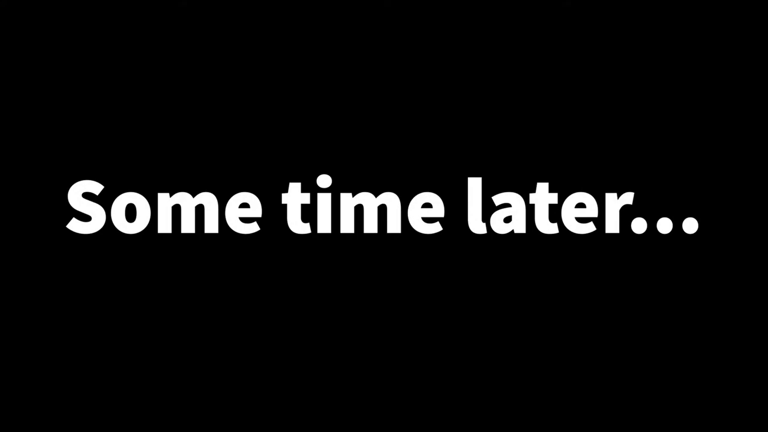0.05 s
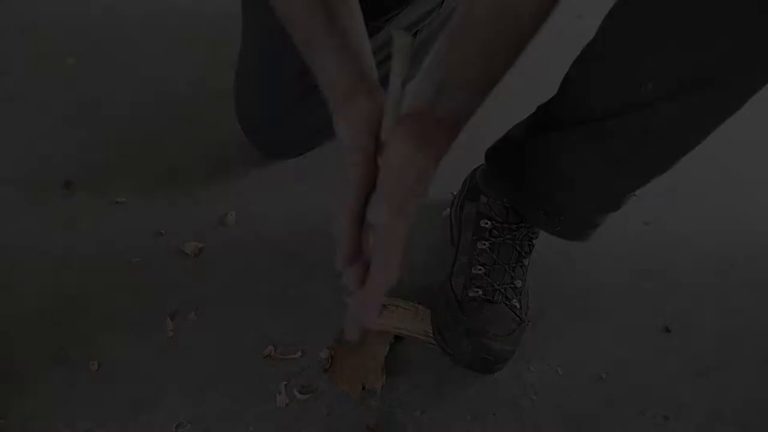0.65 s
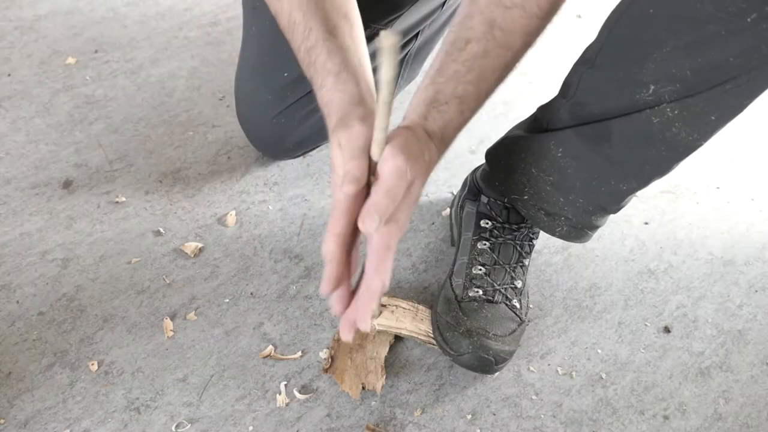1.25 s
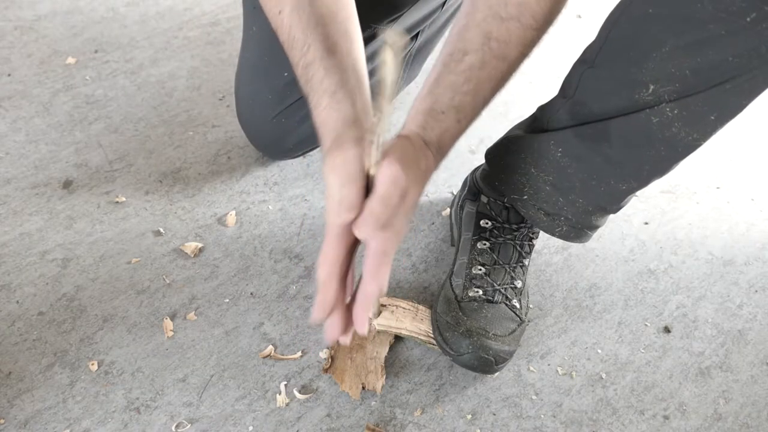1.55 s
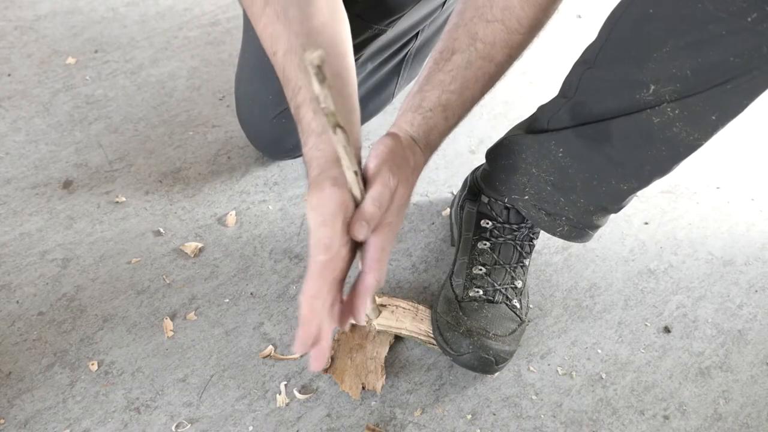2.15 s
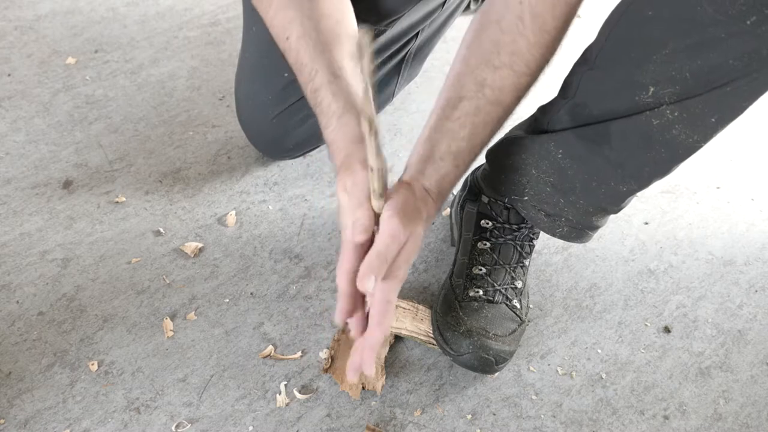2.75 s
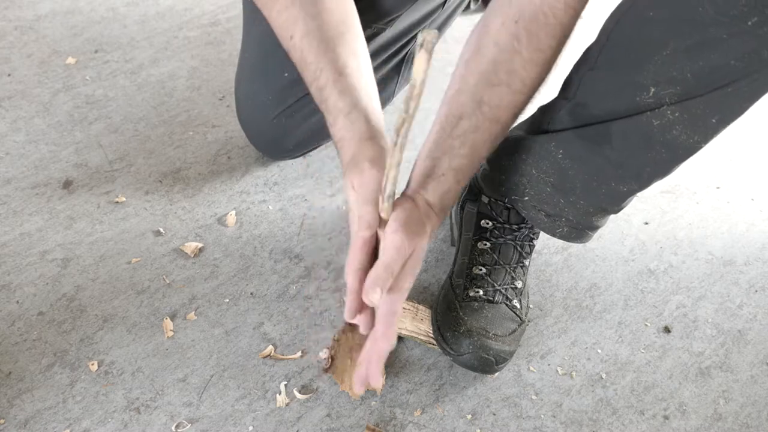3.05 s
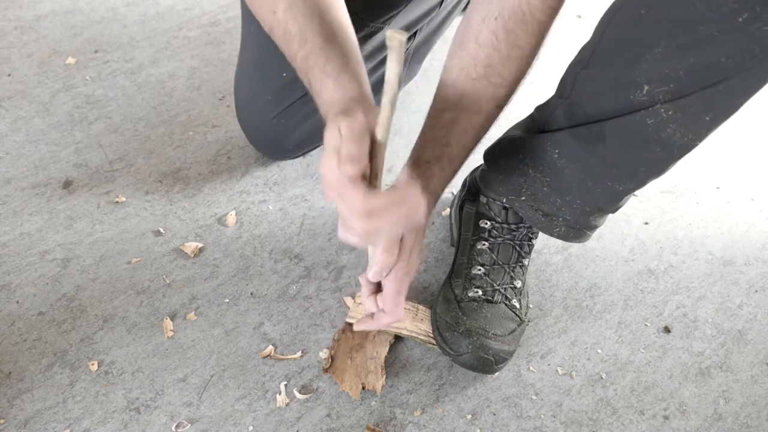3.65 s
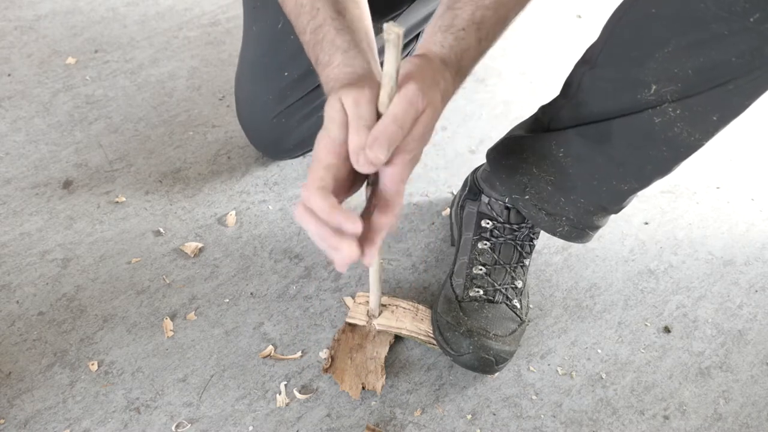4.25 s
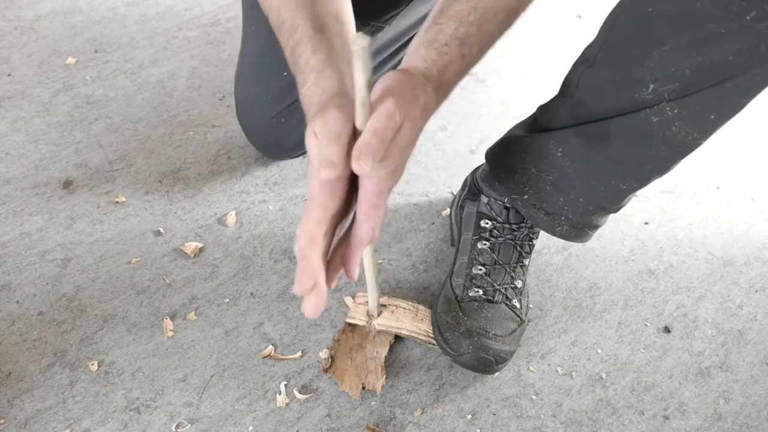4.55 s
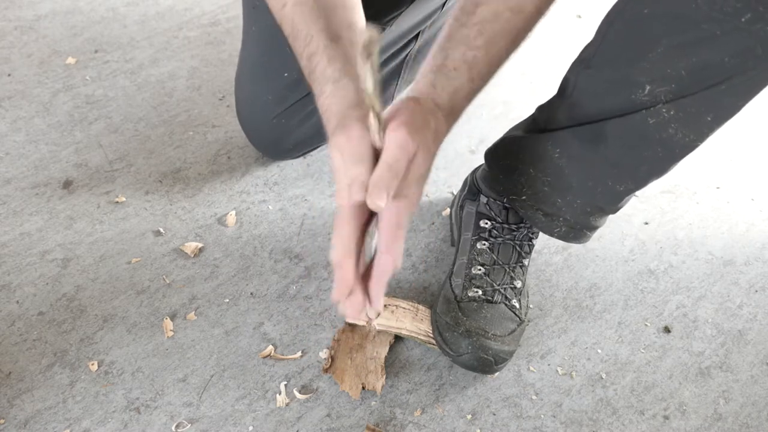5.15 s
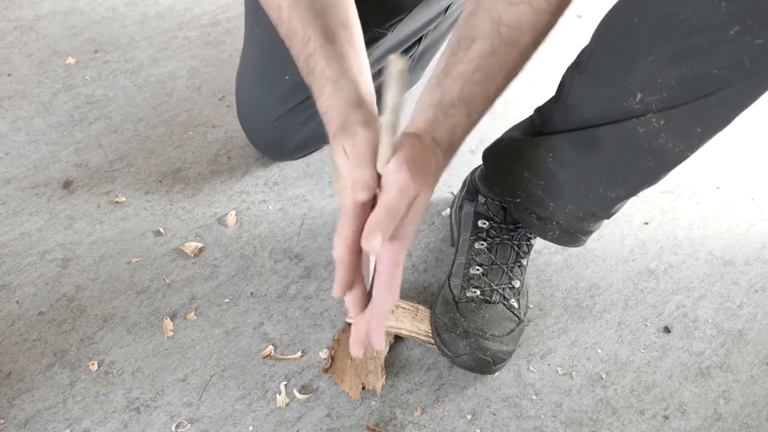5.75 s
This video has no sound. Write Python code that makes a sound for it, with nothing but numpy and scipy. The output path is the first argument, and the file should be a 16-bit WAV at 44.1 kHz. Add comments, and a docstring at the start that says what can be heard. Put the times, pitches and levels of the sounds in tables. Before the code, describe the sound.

After silence, rhythmic scratchy rubbing fades in at about 0.7 seconds over soft outdoor air. A wooden spindle is twirled between dry palms and grinds into a wooden board, about seven strokes a second. From 0.9 seconds the tip gives a wavering, pulsing squeal, with loud, sharp chirps between 1 and 2.5 seconds and a few splinter clicks and light knocks. The squeal weakens around 3 seconds. From 3.3 to 4.3 seconds the strokes turn very light, and a brief, soft swish comes near 4 seconds as a hand slides up the spindle. At 4.4 seconds the hissing and grinding resume, at first with a faint hoarse whistle and several sharp little snaps and a knock up to 5.4 seconds. The squeal returns at 5.6 seconds, with a loud chirp just before 6 seconds.

```python
"""Rhythmic hissing and grinding fade in from silence, over soft outdoor air: a hand drill, its wooden
spindle twirled between two palms on a fire board on a concrete floor. Sliding friction hisses on the skin
and drives the resonances of spindle and board. Stick-slip makes the tip squeal, and chirp loudly where it
grabs; splinters snap, the spindle knocks, and hard strokes whistle. Midway the strokes turn light
while the hands slide back to the top of the spindle; then the drilling resumes."""
import sys
import numpy as np
from scipy import signal
from scipy.fft import rfft, irfft, next_fast_len
from scipy.io import wavfile
from scipy.ndimage import uniform_filter1d, minimum_filter1d, map_coordinates

SR = 44100
rng = np.random.default_rng(int(sys.argv[2]) if len(sys.argv) > 2 else 0)


def unload_audio(sound):
    """Save the sound as a 16-bit wav file, at the path given as the first command line argument."""
    columns = np.transpose(np.atleast_2d(sound))
    # keep every value between -1 and 1, then stretch to whole-number steps
    steps = np.round(np.clip(columns, -1, 1) * 32767)
    wavfile.write(sys.argv[1], SR, steps.astype(np.int16))


N = 264728

# spectra of outdoor air, skin on wood, a splinter and a sliding hand: f/Hz, relative density/dB
AIR_SPECTRUM = [(25, -38), (70, -17), (130, -6), (240, 0), (400, -5.5), (580, -2.5), (950, -9),
                (1400, -6.5), (3000, -15), (6000, -20), (15000, -50)]
SKIN_SPECTRUM = [(200, -26), (900, -19), (2000, 2.5), (3100, 2.5), (3700, -0.5), (4400, 2.5), (5900, -3.5),
                 (6600, 1.5), (8500, -5.5), (10300, -2), (12000, -9.5), (15000, -11)]
SPLINTER_SPECTRUM = [(300, -9), (1500, -4), (3000, 16), (4500, 12.5), (7000, -4.5), (11000, -9),
                     (15000, -5)]
SWISH_SPECTRUM = [(2000, -30), (5000, -6), (7500, 4), (10500, -3), (15000, -11)]
# likeness of the two channels for air and for rubbing: f/Hz, left-right correlation
AIR_CORRELATION = [(40, -0.068), (130, -0.6), (300, 0.22), (700, 0.34), (2000, 0.68), (10000, 0.62)]
RUB_CORRELATION = [(150, 0.27), (500, 0.38), (1500, 0.93), (4000, 0.83), (8000, 0.9), (14000, 0.7)]
# sweeps of the palms, about 7 a second, light during the regrip (3.3-4.3 s):
# start t/s, duration/s, fastest point/fraction, skin level/dB, grinding level/dB, board level/dB
PALM_STROKES = [(0.649, 0.068, 0.26, -42, -44.5, -63), (0.742, 0.12, 0.47, -41, -37.5, -48),
                (0.879, 0.12, 0.2, -38, -36.5, -48), (1.016, 0.11, 0.45, -35.5, -31.5, -42.5),
                (1.134, 0.14, .45, -37.5, -33.5, -44.5), (1.291, .11, 0.28, -38, -39, -52.5),
                (1.421, 0.15, 0.58, -39.5, -37.5, -51.5), (1.582, 0.11, 0.27, -38, -40, -54),
                (1.699, 0.12, 0.75, -38.5, -36.5, -52.5), (1.841, .12, 0.68, -35.5, -38, -47.5),
                (1.98, 0.12, 0.25, -37.5, -36.5, -44), (2.1, 0.1, 0.98, -36.5, -38, -46.5),
                (2.229, 0.14, 0.28, -38.5, -39, -48), (2.359, 0.13, 0.5, -37.5, -36, -48.5),
                (2.486, 0.1, 0.5, -40, -35.5, -60), (2.61, 0.11, 0.62, -41, -37.5, -72),
                (2.743, 0.13, 0.46, -42.5, -37, -56), (2.893, 0.1, 0.4, -39.5, -34, -69),
                (3.013, .12, 0.31, -41, -37, -53), (3.151, 0.1, 0.6, -38, -34.5, -50.5),
                (3.261, 0.087, .3, -46, -40.5, -51.5), (3.34, 0.33, 0.1, -59, -56, -51),
                (3.605, 0.6, 0.15, -54.5, -66, -51.5), (3.878, 0.27, 0.37, -51, -46, -51),
                (4.083, 0.11, 0.84, -51.5, -55, -47.5), (4.2, 0.15, 0.57, -54, -74, -50),
                (4.395, 0.11, 0.69, -37, -36, -45), (4.516, 0.17, 0.43, -39, -34, -45.5),
                (4.658, 0.12, 0.42, -36.5, -35, -44), (4.799, 0.1, 0.46, -35, -34, -49),
                (4.917, 0.11, 0.39, -38, -33, -46.5), (5.05, 0.11, 0.37, -34.5, -33, -45.5),
                (5.163, 0.14, 0.64, -38.5, -33, -54.5), (5.326, 0.13, 0.22, -40, -34, -45),
                (5.454, 0.12, 0.77, -39.5, -34, -49), (5.594, 0.17, 0.19, -42, -35.5, -48.5),
                (5.725, .14, 0.57, -37.5, -34, -47), (5.884, 0.1, 0.56, -36, -34, -46.5)]
# resonances of the spindle, of the board, and the one that whistles: f/Hz, bandwidth/Hz, gain/dB
SPINDLE_MODES = [(1230, 48, -30), (1800, 300, 4.5), (2072, 320, 8), (2423, 150, 1), (2950, 88, 1.5),
                 (3264, 30, 5), (4146, 220, -2.5), (5390, 350, -10.5), (6040, 170, -18), (7530, 270, -51.5)]
BOARD_MODES = [(467, 140, -3.5), (577, 180, -1.5), (970, 1600, -12), (1670, 230, 38), (1780, 260, -2),
               (2430, 230, -11), (4240, 350, -18)]
WHISTLE_MODE = (4290, 200, 0)
# stick-slip of the tip, one list for each pass of the hands:
# t/s, level/dB, f/Hz, relative octave level/dB, relative third partial level/dB, roughness (0-1)
SQUEAL_PASSES = [
    [(.87, -34.5, 1600, -5.5, -24, 0.72), (1.1, -36.5, 1681, -10, -23, 0.4),
     (1.22, -28.5, 1637, -12.5, -14, 0.8), (1.3, -42, 1644, -25, -17, 0.5),
     (1.37, -27.5, 1494, -17, -12, 0.4), (1.88, -30, 1540, -19, -24, 0.45),
     (1.98, -19.5, 1571, -15, -22, 0.26), (2.24, -28, 1567, -7.5, -14, 0.42),
     (2.5, -28.5, 1610, -3, -21, 0.14), (2.7, -34, 1628, -6, -13, 0.39), (2.87, -41, 1656, -14, -17, .35),
     (3.3, -39, 1662, -19, -16, 0.7), (3.52, -55, 1682, -13, -12, 0.34)],
    [(5.61, -30, 1644, -25, -29, 0.38), (5.78, -29, 1625, -21, -16, .4), (5.88, -37, 1630, -17, -18, 0.35),
     (6.0, -29.5, 1600, -1, -10, 0.4)],
]
# reverberation of the surroundings: f/Hz, T60/s
REVERB_TIMES = [(200, 0.1), (2000, 0.64), (10000, 0.054)]
# splinters breaking in the socket: t/s, peak level/dB
SPLINTER_SNAPS = [(0.8814, -33), (1.0539, -10.5), (1.6624, -15.5), (2.9189, -40), (3.1866, -31),
                  (3.568, -39), (3.942, -30), (4.593, -18), (4.8182, -27), (4.8647, -11.5), (5.1183, -7),
                  (5.3583, -10), (5.3644, -12.5)]
# grabs of the tip: t/s, level/dB, f/Hz, glide/(Hz/s), rise/s, fall/s,
# relative overtone level/dB, relative scrape level/dB
TIP_GRABS = [(.884, -23.5, 2110, -20000, .002, 0.0017, -25, -29),
             (1.0611, -6, 1580, 0, 0.0012, 0.0012, -13, -28),
             (1.343, -3, 1508, -8000, 0.0051, 0.0056, -21.5, -22.5),
             (1.627, -2, 1563, -4000, 0.002, 0.006, -26, -26.5),
             (1.9074, 7, 1575, -1500, 0.0016, 0.011, -5, -25),
             (2.125, -17, 1524, 0, 0.0026, .0063, -14.5, -36),
             (2.161, -3.5, 1551, -1000, 0.0034, 0.0075, 4, -14.5),
             (2.426, 1.5, 1613, 1000, 0.0033, 0.0052, -1.5, -21.5),
             (2.541, -19.5, 1647, 0, 0.0029, 0.021, -8, -35),
             (2.693, -25.5, 1623, 0, 0.015, 0.0096, -25, -30), (5.283, -24, 2600, 0, .008, .005, -17, -12),
             (5.621, -26, 1080, 19998, 0.0033, .006, 1, -12),
             (5.631, -10.5, 1640, 1000, 0.006, 0.006, -12.5, -32),
             (5.693, -27, 1663, 0, .002, 0.013, -9, -16), (5.938, 1, 1611, -1500, 0.0022, 0.0055, -11, -25)]
# overtones of a chirp: harmonic number, level/dB relative to the grab's overtone level
GRAB_HARMONICS = [(2, -3.5), (3, -21.5), (4, -22), (5, -47)]
# impacts of the spindle on the socket wall: t/s, knock peak level/dB, thud peak level/dB
WALL_IMPACTS = [(1.060, -11.5, -12.5), (1.225, -22.5, -30), (2.322, -26, -30), (2.816, -35, -29.5),
                (3.046, -23, -31), (3.213, -29, -29), (5.3618, -40, -26), (5.3647, -13, -24),
                (5.626, -31, -33), (5.76, -24, -21)]
# whistles of hard-pressed strokes: t/s, level/dB
WHISTLE_SWELLS = [(2.94, -46), (3.06, -43), (3.205, -44), (4.458, -34), (4.585, -37.5), (4.86, -42),
                  (4.96, -42.5), (5.1, -42)]
# a hand sliding up the spindle: t/s, level/dB
HAND_SLIDE = [(3.95, -60), (3.978, -47), (3.992, -36.5), (4.01, -47), (4.05, -58)]
# opening fade: t/s, gain
FADE_IN = [(0, 0), (.62, 0), (.7, .4), (.8, 1)]

SKIN_LAW, GRIND_LAW, BOARD_LAW, SQUEAL_LAW = 0.82, 0.78, 0.86, 0.54  # amplitude follows speed ** law
SHAKE, WAVER, DRIFT = 0.00555, .008, .009  # fast, medium and slow fractional changes of the squeal's pitch


def amp(db):
    """Amplitude ratio of a level in decibels."""
    return 10 ** (np.asarray(db) / 20)


def unit(x):
    """Normalisation to rms 1."""
    return x / np.sqrt(np.mean(np.abs(x) ** 2) + 1e-20)


def along(points, hz):
    """Interpolation of (f/Hz, value) points on a logarithmic frequency axis."""
    f, v = np.transpose(points)
    return np.interp(np.log(hz + 1), np.log(f + 1), v)


def curves(rows):
    """Linear interpolation in time: one value per sample for each column after the first."""
    times, *columns = np.transpose(rows)
    return [np.interp(np.arange(N) / SR, times, column) for column in columns]


def wobble(rate, size=N):
    """Smooth random modulation: a spline through rate knots a second."""
    knots = rng.standard_normal(size // 10)
    return map_coordinates(knots, [np.arange(size) * rate / SR], mode="wrap")


def filtered(x, response):
    """Linear filtering: the spectrum of x times a complex frequency response."""
    m = next_fast_len(N + SR // 2)
    return irfft(rfft(x, m) * response(np.fft.rfftfreq(m, 1 / SR)), m)[..., :N]


def body(modes, hz):
    """Modal superposition: damped resonances add, with notches between them."""
    return sum(amp(db) * 1j * hz * width / (f * f - hz * hz + 1j * hz * width) for f, width, db in modes)


def rush(colour, patchy_db, grain_db, correlation=RUB_CORRELATION):
    """Modulated stereo noise of rms 1: grains of random size, coloured, in drifting spectral patches."""
    grains = rng.standard_normal((2, N)) * amp(grain_db * wobble(1500))
    spectra = signal.stft(grains, nperseg=512)[2]
    patches = uniform_filter1d(rng.standard_normal(spectra.shape[1:]), size=4, axis=0)
    patches = uniform_filter1d(patches, size=7, axis=1)
    pair = signal.istft(spectra * amp(patchy_db * unit(patches)), nperseg=512)[1][:, :N]
    angle = lambda hz: np.arccos(np.clip(along(correlation, hz), -1, 1)) / 2
    mid, side = filtered(pair, lambda hz: colour(hz) * np.array([np.cos(angle(hz)), np.sin(angle(hz))]))
    return unit(np.array([mid + side, mid - side]))


def blows(rows, colour, t60):
    """Impact excitation: an impulse and decaying contact noise, coloured, for each (t/s, peak level/dB)."""
    out, t = np.zeros(N + SR), np.arange(SR // 20) / SR
    lead = SR // 200
    for s, db in rows:
        push = rng.standard_normal(len(t)) * amp(-60 * t / t60)
        push[0] += 3
        hit = irfft(rfft(np.roll(push, lead)) * colour(np.fft.rfftfreq(len(t), 1 / SR)))
        out[round(s * SR) - lead:][:len(hit)] += amp(db) * hit / np.abs(hit).max()
    return out[:N]


def strokes(levels_db, law, overlap_s=0.02):
    """Power law of rubbing: gain follows the speed, which rises from rest and falls in every stroke."""
    t, power = np.arange(N) / SR, np.zeros(N)
    for (start, length, fastest, *_), db in zip(PALM_STROKES, levels_db):
        marks = [start - overlap_s, start + length * fastest, start + length + overlap_s]
        moving = (t > marks[0]) & (t < marks[-1])
        speed = np.abs(np.sin(np.interp(t[moving], marks, [0, np.pi / 2, np.pi])))
        power[moving] += (amp(db) * speed ** law) ** 2
    return np.sqrt(power)


def singing():
    """Friction regime: 1 while the tip sticks and slips, 0 while it only slides."""
    t = np.arange(N) / SR
    inside = sum((t > rows[0][0]) & (t < rows[-1][0]) for rows in SQUEAL_PASSES)
    return uniform_filter1d(inside.astype(float), size=400)


def scraping(takeover_db=-34):
    """Share of rough friction: it shrinks as the squeal grows, to one half at takeover_db."""
    level_db = curves(np.vstack(SQUEAL_PASSES))[0]
    return 1 / (1 + singing() * amp(level_db - takeover_db) ** 2)


def outdoor_air():
    """Ambient noise: a soft, partly correlated wash, slightly stronger on the left."""
    wash = rush(lambda hz: amp(along(AIR_SPECTRUM, hz)), patchy_db=1.5, grain_db=2.5,
                correlation=AIR_CORRELATION)
    return amp(-49) * wash * amp([[.9], [-.9]])


def palms():
    """Sliding friction: dry skin hisses, and the spindle's upper modes rasp while the tip runs rough."""
    *_, skin_db, _, _ = np.transpose(PALM_STROKES)
    hiss = rush(lambda hz: amp(along(SKIN_SPECTRUM, hz)), patchy_db=4, grain_db=1.5)
    rasp = rush(lambda hz: body(SPINDLE_MODES[6:], hz), patchy_db=6, grain_db=3.5)
    return strokes(skin_db, SKIN_LAW) * amp(1.6 * wobble(45)) * (hiss + amp(-6.5) * scraping() * rasp)


def socket():
    """Forced vibration: charred grit grinds under the tip, so the spindle rings and the board thrums."""
    *_, grind_db, board_db = np.transpose(PALM_STROKES)
    grit_gain = amp(-2.5 * (1.5 - scraping()) + 1.67 * wobble(120))  # a singing tip grinds less
    grit = grit_gain * rush(lambda hz: body(SPINDLE_MODES, hz), patchy_db=3.5, grain_db=2)
    thrum = amp(2.6 * wobble(50)) * rush(lambda hz: body(BOARD_MODES[:3], hz), patchy_db=2.5, grain_db=.5)
    return strokes(grind_db, GRIND_LAW) * grit + strokes(board_db, BOARD_LAW) * thrum * amp([[.6], [-.6]])


def squeal(flutter_db=3.5):
    """Stick-slip oscillation: the tip's pitch shakes with the grit, and its level sags at each reversal."""
    level_db, pitch, octave_db, third_db, rough = curves(np.vstack(SQUEAL_PASSES))
    unsteady = 1 + SHAKE * wobble(400) + WAVER * wobble(60) + DRIFT * wobble(14)
    phase = 2 * np.pi * np.cumsum(pitch * unsteady) / SR

    def partial(order):
        """Random modulation: grit jolts the phase and amplitude of each partial."""
        jolt = 2.13 * rough * order ** .5 * wobble(330)
        return np.sin(order * phase + jolt) * unit(amp(flutter_db * wobble(110)))

    tone = partial(1) + amp(octave_db) * partial(2) + amp(third_db) * partial(3)
    # period doubling: under hard pressure strong and weak slips alternate
    halfway = amp(octave_db - 6) * partial(3 / 2)
    drive = strokes(np.zeros(len(PALM_STROKES)), SQUEAL_LAW)
    return amp(level_db) * drive * singing() * (tone + halfway)


def reflections(x):
    """Reverberation: floor and walls return a short, exponentially decaying tail, different at each ear."""
    hz, t, spectra = signal.stft(rng.standard_normal((2, SR // 2)), SR, nperseg=256)
    decay = amp(-60 * t / along(REVERB_TIMES, hz)[:, None])
    tail = signal.istft(spectra * decay, SR, nperseg=256)[1]
    return signal.fftconvolve(x[None], tail / np.linalg.norm(tail[0]), axes=1)[:, :N]


def snaps():
    """Brittle fracture: splinters break in the socket with brief, bright clicks."""
    return blows(SPLINTER_SNAPS, lambda hz: amp(along(SPLINTER_SPECTRUM, hz)), t60=.006)


def chirps():
    """Transient stick-slip: the tip grabs, and its tone swells for milliseconds and grows harmonics."""
    out, t = np.zeros(N + SR), np.arange(-SR // 20, SR // 20) / SR
    friction = rush(lambda hz: amp(along(SKIN_SPECTRUM, hz)), patchy_db=2.5, grain_db=2)[0]
    for s, db, hz, glide, rise, fall, overtone_db, scrape_db in TIP_GRABS:
        start = round(s * SR) - len(t) // 2
        swell = np.exp(-np.abs(t / np.where(t < 0, rise, fall)) ** 1.43)
        phase = 2 * np.pi * (hz * t + glide * t * t / 2) + 0.39 * wobble(336.5, size=len(t))
        overtones = sum(amp(level) * np.sin(k * phase) for k, level in GRAB_HARMONICS)
        tone = np.sin(phase) + swell ** .5 * amp(overtone_db) * overtones
        scrape = amp(scrape_db) * np.roll(friction, -start)[:len(t)]
        out[start:][:len(t)] += amp(db) * swell * (tone + scrape)
    return out[:N]


def knocks():
    """Modal response to impact: the spindle hits the socket wall; high board modes knock, low ones thud."""
    times, knock_db, thud_db = np.transpose(WALL_IMPACTS)
    # the thuds carry little deep bass: below about 250 Hz they fall away steeply
    low_modes = lambda hz: body(BOARD_MODES[:3], hz) * (1j * hz / (1j * hz + 250)) ** 2
    raps = blows(zip(times, knock_db), lambda hz: body(BOARD_MODES[3:], hz), t60=0.028)
    thuds = blows(zip(times, thud_db), low_modes, t60=0.034)
    return raps + thuds


def whistles(half_width_s=0.033):
    """Resonance: one narrow spindle mode, fed by the grinding, swells hoarsely in hard-pressed strokes."""
    t = np.arange(N) / SR
    swell = sum(amp(db) * np.exp(-((t - s) / half_width_s) ** 2) for s, db in WHISTLE_SWELLS)
    return swell * rush(lambda hz: body([WHISTLE_MODE], hz) ** 2, patchy_db=4, grain_db=3)


def regrip():
    """Light sliding friction: a high swish as one hand returns to the top."""
    level_db, = curves(HAND_SLIDE)
    return amp(level_db) * rush(lambda hz: amp(along(SWISH_SPECTRUM, hz)), patchy_db=5, grain_db=1.5)


def scene():
    """Superposition: the tip's sounds and their faint reflections add to the rubbing and the air."""
    tip = squeal() + snaps() + chirps() + knocks()
    return outdoor_air() + palms() + socket() + tip + amp(-15) * reflections(tip) + whistles() + regrip()


def limiter(x, ceiling_db, release_db_per_s):
    """Peak limiting: peaks push the gain down at once, and it recovers at a steady rate."""
    over_db = np.maximum(20 * np.log10(np.abs(x).max(axis=0) + 1e-9) - ceiling_db, 0)
    ramp = release_db_per_s * np.arange(N) / SR
    cut_db = np.maximum.accumulate(over_db + ramp) - ramp
    return x * uniform_filter1d(minimum_filter1d(amp(-cut_db), size=65), size=65)


def record(dry, bass_cut_hz=25, top_hz=15500):
    """Gain control and band limiting: limiter, fade-in, the microphone's bass roll-off, a treble cut."""
    fade, = curves(FADE_IN)
    held = fade * limiter(dry, ceiling_db=-6.5, release_db_per_s=66)
    thin = filtered(held, lambda hz: (1j * hz / (1j * hz + bass_cut_hz)) ** 2)
    return filtered(thin, lambda hz: amp(-120 * np.clip((hz - top_hz) / 500, 0, 2)))


dry = scene()
out = record(dry)
unload_audio(out)
```